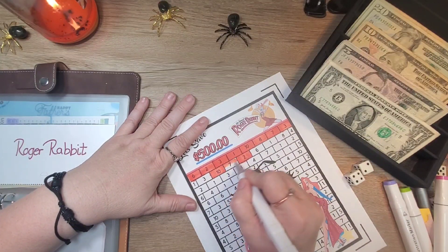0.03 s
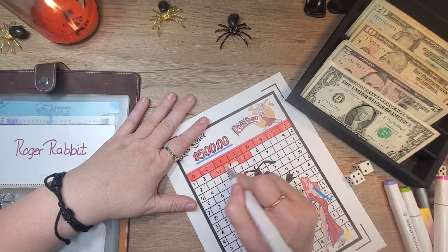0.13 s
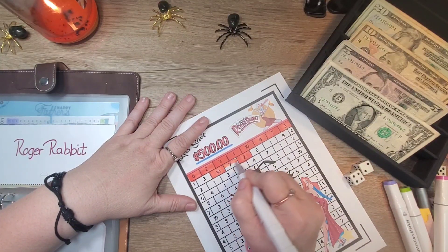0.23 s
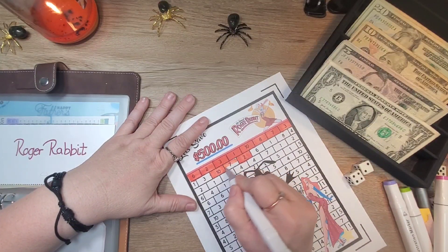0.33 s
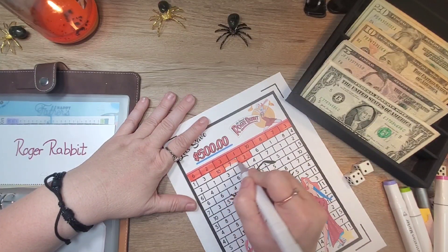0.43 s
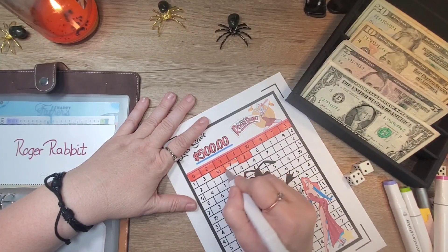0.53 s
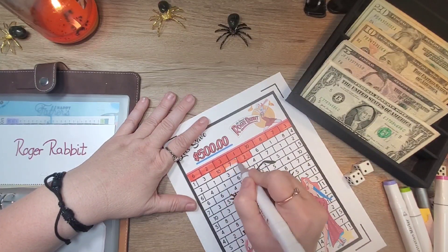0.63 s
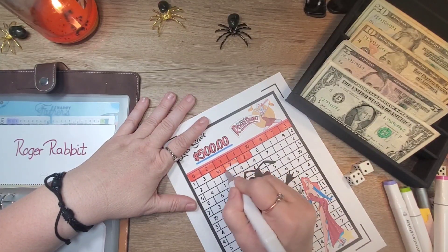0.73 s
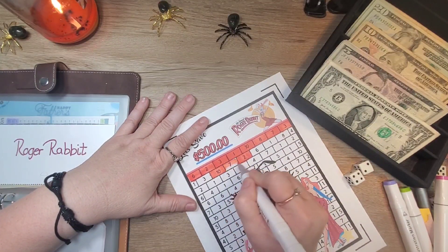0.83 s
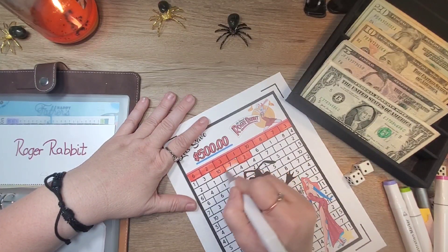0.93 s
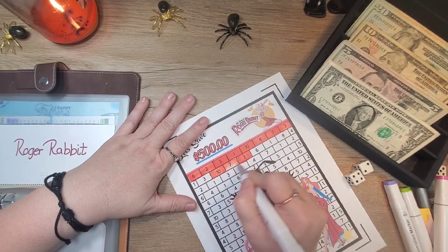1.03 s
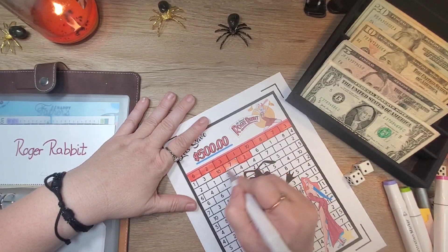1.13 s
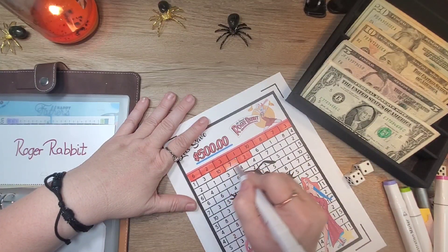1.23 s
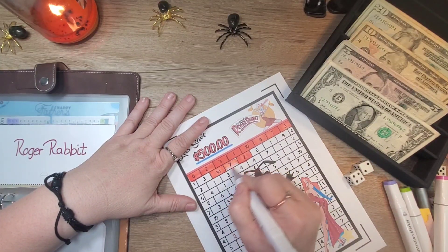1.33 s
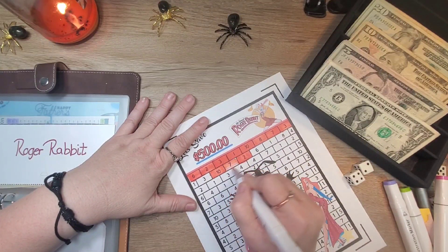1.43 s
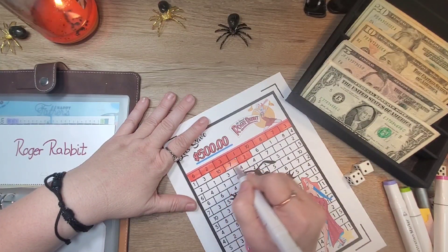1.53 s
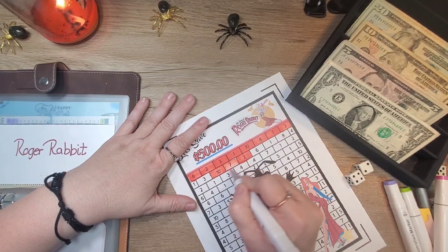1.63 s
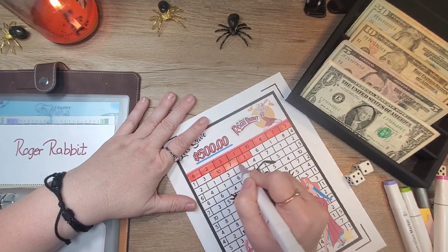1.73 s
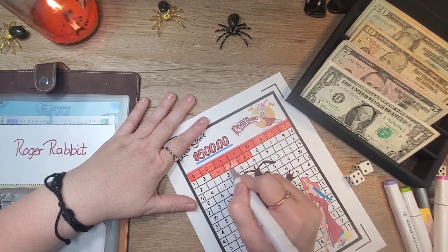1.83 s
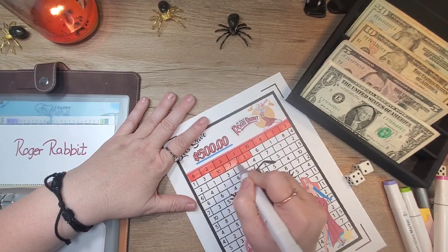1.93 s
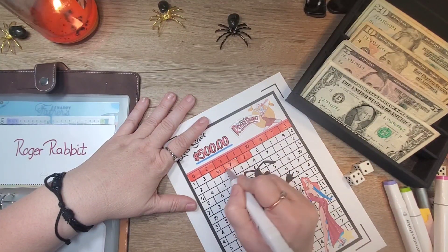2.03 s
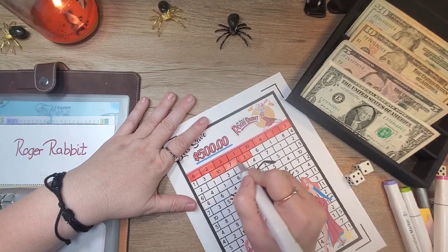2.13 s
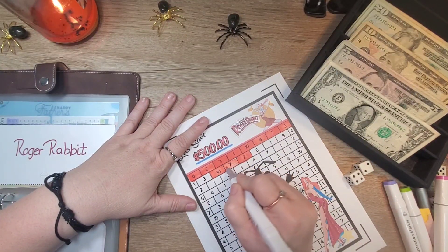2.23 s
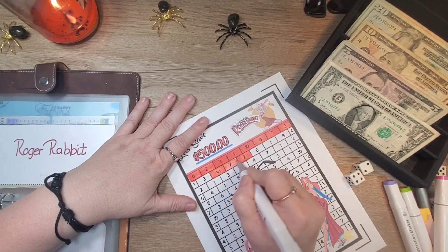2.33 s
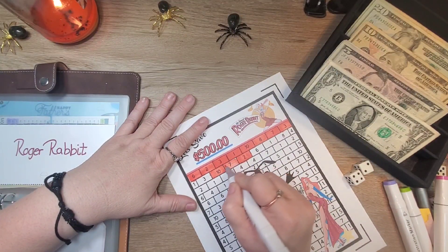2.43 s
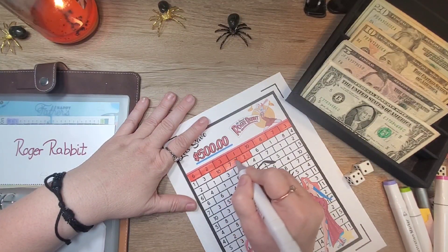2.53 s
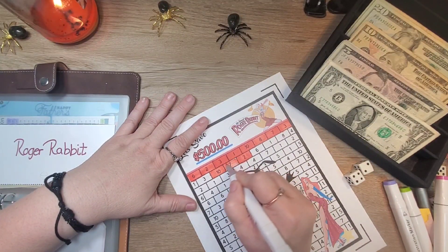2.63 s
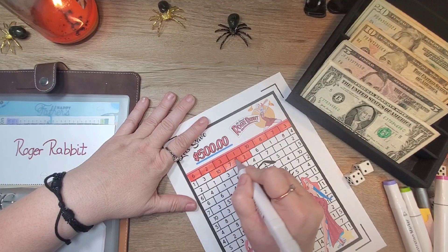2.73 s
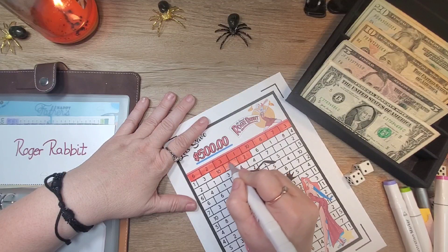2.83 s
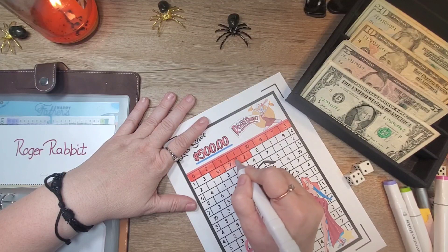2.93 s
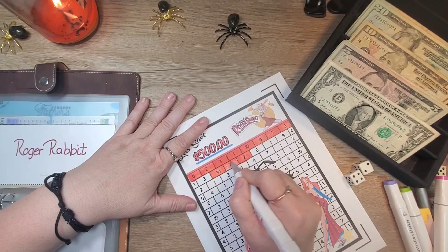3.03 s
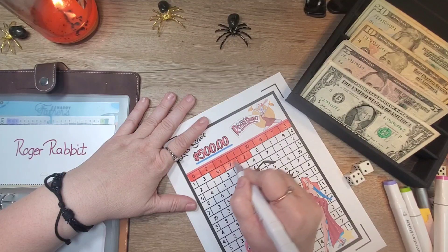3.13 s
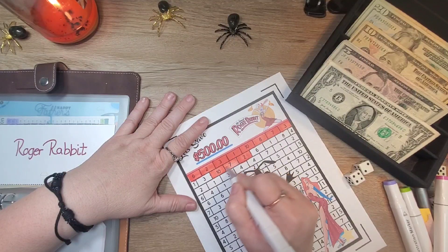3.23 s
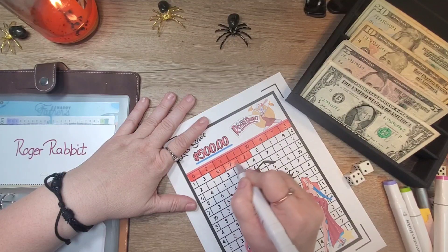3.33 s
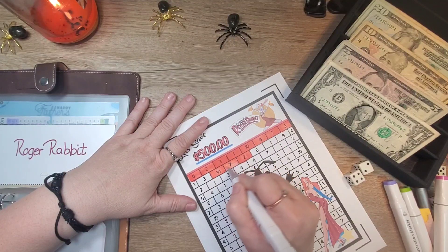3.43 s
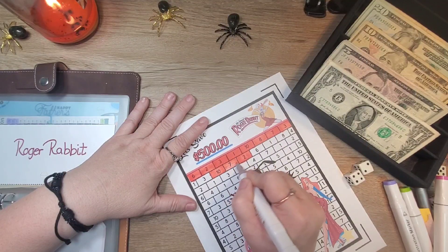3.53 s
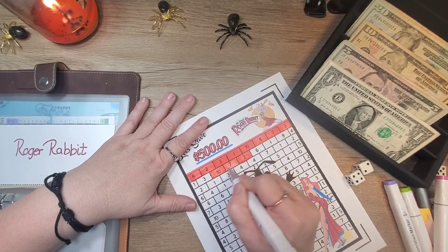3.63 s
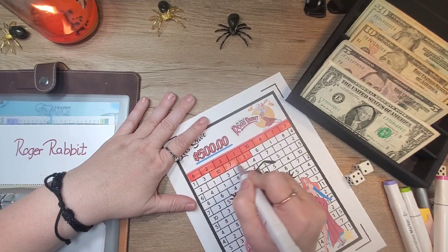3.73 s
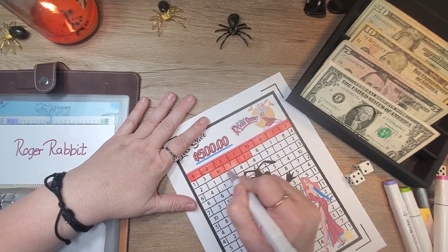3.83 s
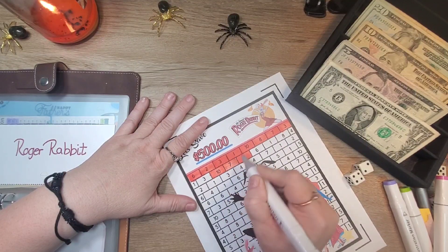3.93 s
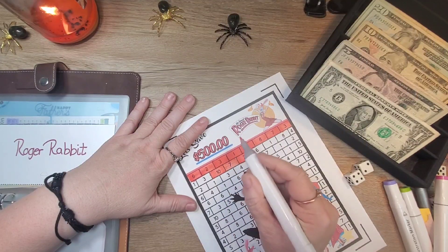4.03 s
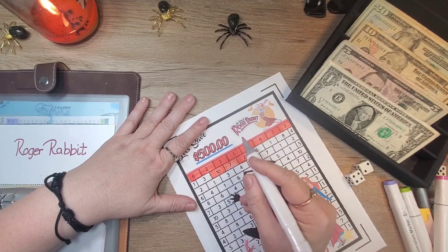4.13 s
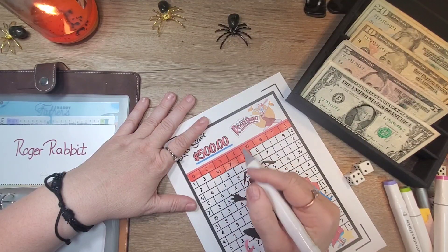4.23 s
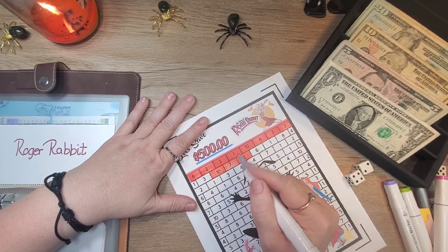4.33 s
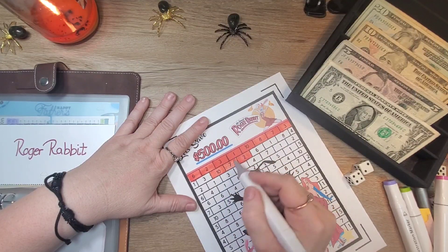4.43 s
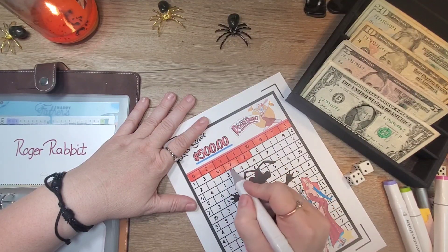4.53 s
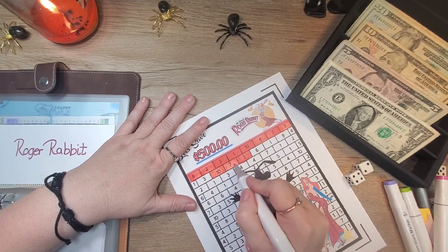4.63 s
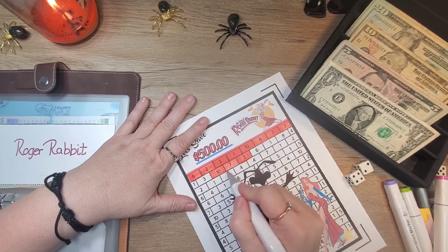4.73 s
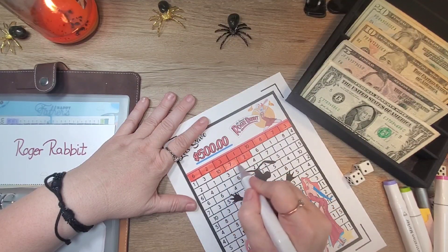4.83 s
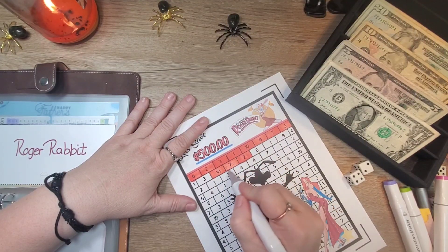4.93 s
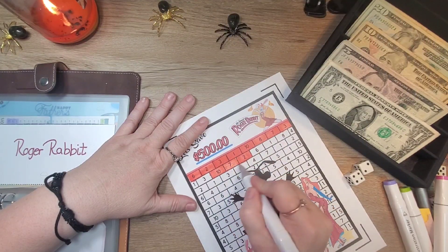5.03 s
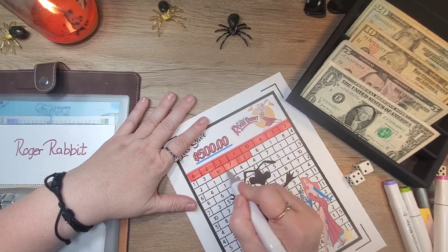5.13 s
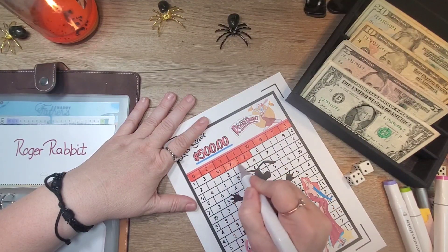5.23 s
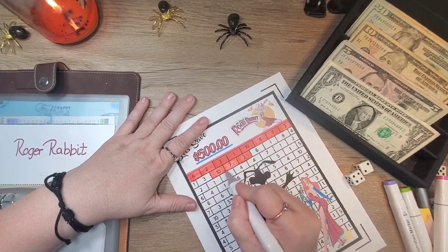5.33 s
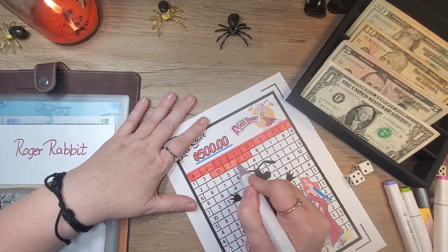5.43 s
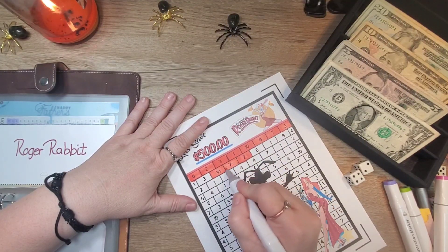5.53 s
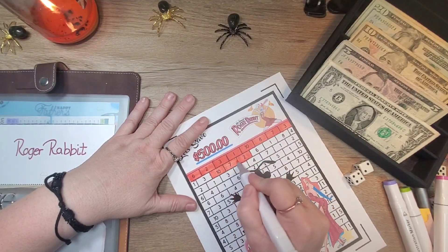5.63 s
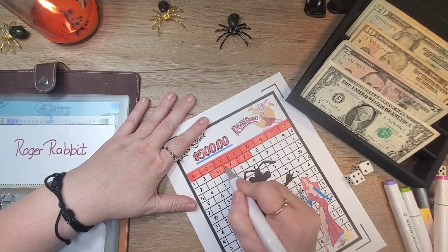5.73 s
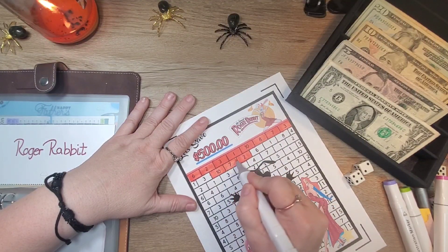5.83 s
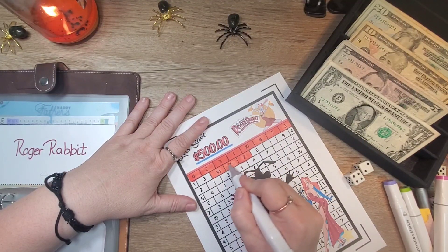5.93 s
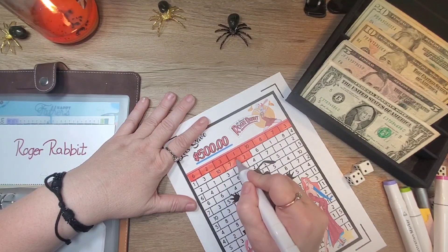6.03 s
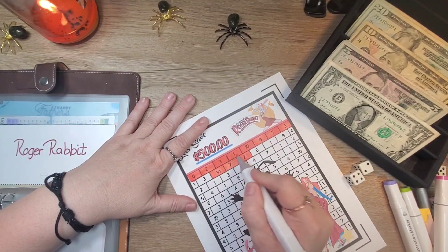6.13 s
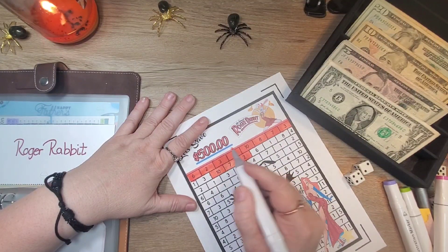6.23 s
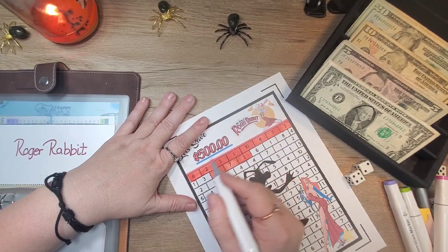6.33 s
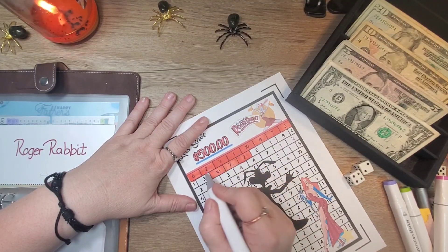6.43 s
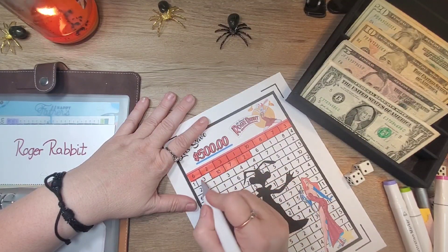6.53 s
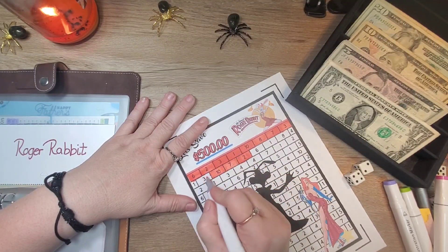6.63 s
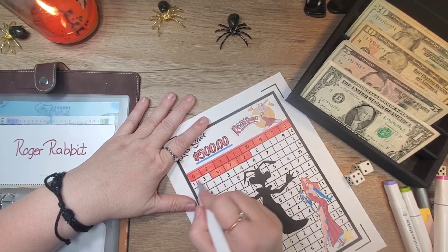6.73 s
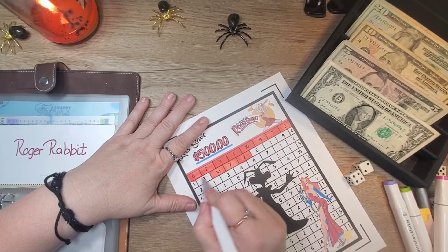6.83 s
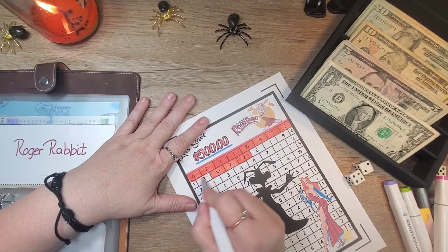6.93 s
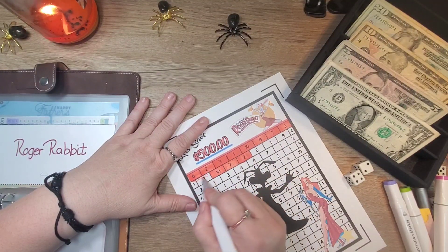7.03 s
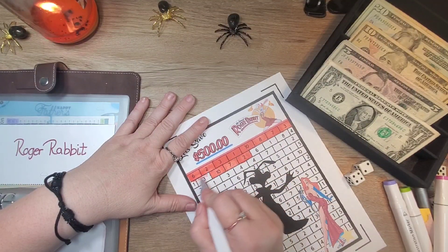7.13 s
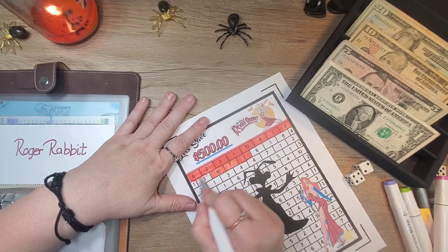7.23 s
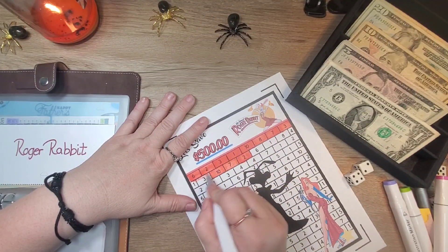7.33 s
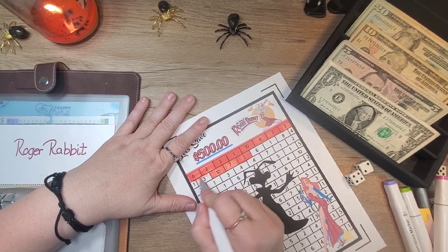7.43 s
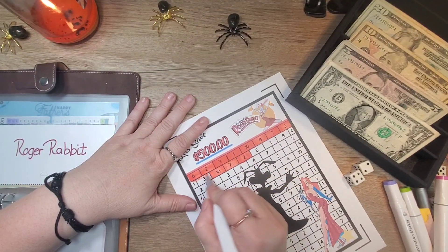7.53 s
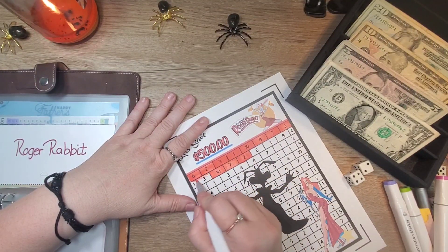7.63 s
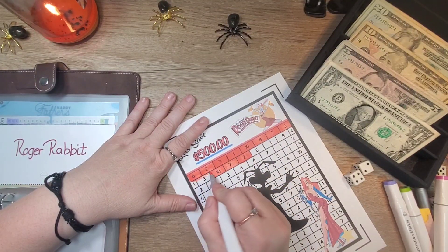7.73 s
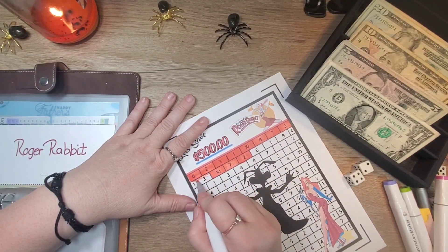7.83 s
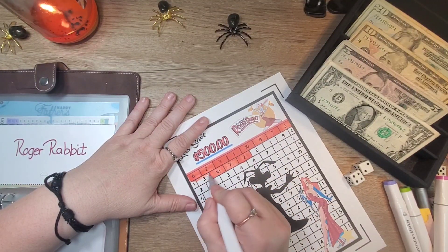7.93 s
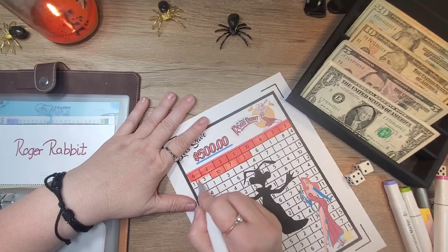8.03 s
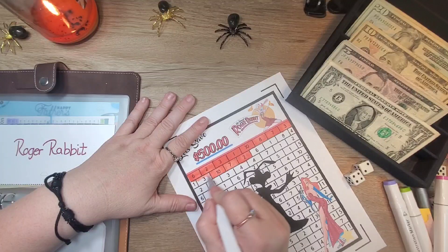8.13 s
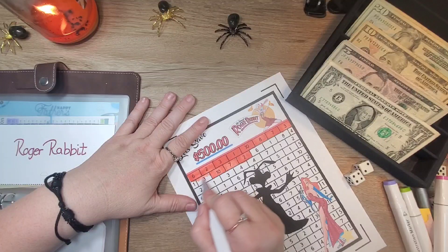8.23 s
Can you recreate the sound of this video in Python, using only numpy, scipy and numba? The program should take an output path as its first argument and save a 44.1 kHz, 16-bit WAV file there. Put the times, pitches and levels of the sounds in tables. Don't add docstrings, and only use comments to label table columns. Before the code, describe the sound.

A close stereo sound of a felt marker rubbing quickly to and fro on paper on a wooden desk, with faint low hum in a small quiet room. From 0 to about 4.0 seconds the strokes run steadily, nearly five round trips a second, each a dry high scratch swelling and fading, with thin squeaks around five kilohertz and little clicks at the turns. From 2.7 they hurry slightly and become louder and squeakier. At 4.2 and 4.5 the pen ticks lightly amid soft skin brushing and a barely audible steady chair whine. Scribbling resumes gently near 4.75, soon firm, rougher and less tonal, until 6.1. A sharp tick at 6.18, faint brushing and near silence follow, then a dry crack at 6.77. From 6.8 to 8.3 the flatter pen gives broader, hissier strokes, building from light to firm.

```python
import sys
import numpy as np
from scipy import signal
from scipy.fft import rfft, irfft, next_fast_len
from scipy.io import wavfile
from numba import njit

SR = 44100
rng = np.random.default_rng(int(sys.argv[2]) if len(sys.argv) > 2 else 0)


def ratio(d):
    e = np.asarray(d, float) / 20
    return 10 ** e


def dump_mix(stems):
    frames = np.atleast_2d(stems).T
    limited = np.clip(frames, -1, 1)
    pcm = np.round(limited * 32767).astype(np.int16)
    wavfile.write(sys.argv[1], SR, pcm)


N = 364707

# pitch_hz, density_db (per Hz)
HUM = [(20, -19), (35, 1.5), (45, -4), (58, 9), (72, -3), (100, -8.5), (121, 4), (150, -3.5), (190, -5),
       (250, -6), (620, -9), (800, -18), (2000, -18), (16000, -46)]
# pitch_hz, likeness (-1 to 1)
LIKENESS = [(60, 0.97), (180, 0.9), (550, -0.04), (1650, -0.48), (4970, -0.48), (15000, 0.048)]
HUM_DB = -56
ROOM_T60_S, ROOM_DB = 0.32, -16.5
# pitch_hz, left_louder_db, left_lead_rad (beyond the lag), other_spot_share (0-1)
PORTS = [(1000, 1, .8, .5), (2300, 5, 1.5, .6), (3000, 1, 1.3, .5), (3900, -6, .6, .5), (4600, -3, -.3, .3),
         (4950, 9, -2.4, .4), (5450, 8, -2, .5), (5900, 5, .3, .4), (6400, 5, -.7, .5), (6900, -5, 0, .7),
         (8300, 9, -2, .7), (8900, 0, -.5, .5), (9300, 5, -.8, .6), (15000, 0, -1, .8)]
PORT_LAG_S = 13 / 44100

# start_s, pitch_hz, level_db, overtones_db
WHINE = [
    (4.1, 978, -88, 0),
    (4.16, 985, -70, 0),
    (4.28, 978, -69, -2),
    (4.4, 972, -68, -14),
    (4.5, 978, -73, -16),
    (4.54, 978, -90, -16),
]
# multiple, level_db
WHINE_ORDERS = [(1, -1), (1.5, 0), (2, 0), (3, 2), (4, -5)]
# start_s, level_db
BRUSH = [
    [(4.0, -63), (4.2, -67.5), (4.26, -65), (4.3, -79), (4.48, -79), (4.52, -64), (4.62, -63), (4.68, -82),
     (4.74, -87)],
    [(6.13, -48), (6.2, -89), (6.25, -71), (6.33, -65.5), (6.42, -59.5), (6.48, -61.5), (6.53, -80),
     (6.79, -111)],
]
# pitch_hz, density_db (per Hz)
SKIN = [(600, -50.5), (1200, -26), (3000, -11), (6000, -8.5), (9000, -15.5), (13000, -13), (15500, -13.5)]
# start_s, crack_db, thump_db
TICKS = [
    (4.211, -53, -54),
    (4.2452, -71, -68.5),
    (4.5082, -53, -62),
    (6.1816, -43.5, -49.5),
    (6.774, -46.5, -69),
]

# pitch_hz, width_hz, level_db
SHEET = [(1143, 160, -23), (1622, 100, -32.5), (1872, 65, -22), (2335, 117, -17), (2893, 520, -20),
         (3063, 110, -14)]
NIB = [(4400, 240, -9.5), (4971, 82, 4), (5400, 570, -4)]
FELT = [(6730, 460, -12.5), (7880, 1850, -12.5), (8638, 660, -10.5), (6196, 625, -7.5)]
EDGE = [(10200, 360, -30.5), (11280, 700, -18.5), (12460, 1400, -12.5), (14640, 210, -21)]
# pitch_hz, width_hz, level_db
SHOULDER = [(3720, 530, -24.5)]
# start_s, tilt (0-1), pressure_db
GRIP = [
    (0, 0.12, 5),
    (1.8, 0.03, 0.5),
    (2.7, 0.23, 0.5),
    (3.5, 0.32, -1),
    (4, 0.33, 0.5),
    (4.8, 0.24, -4.5),
    (6.1, 0.1, -0.5),
    (6.8, 1, -8.5),
    (7.6, 0.95, -1.6),
    (8.27, .95, 3),
]
# upright_db, full_tilt_change_db, pressure_share
PARTS = [(-0.5, -3.5, .3), (0.3, -8, 0.13), (-1.26, 0.5, .1), (-6.5, 0.4, 1), (8, -17, .05)]

# start_s, level_db, swell_db (start to end), slip_rate_hz (full speed),
# squeak_db
OUTWARD = [(.042, -29.5, -4, 4914, -27), (.252, -30.5, -3.5, 5490, -20), (.46, -29, 1, 5726, -20),
           (.671, -30, -2.5, 5410, -20), (.887, -27.5, -3.5, 5210, -26), (1.097, -31.5, -6.5, 5420, -21),
           (1.309, -29, 1.5, 5500, -32.5), (1.524, -30.5, -3.5, 5500, -23), (1.741, -32.5, -5, 5360, -20),
           (1.956, -32, 3, 5210, -29.5), (2.157, -29.5, 5.5, 5440, -21), (2.364, -31.5, -2, 5400, -21),
           (2.571, -27.5, 3, 5185, -24), (2.767, -27, 9.5, 4950, -18.5), (2.965, -26.5, -1, 4582, -30),
           (3.152, -34.5, 2, 5340, -32.5), (3.348, -26.5, 10, 5570, -26.5), (3.55, -25, 0.5, 4900, -13.5),
           (3.749, -28.5, 2, 5390, -22.5), (3.953, -19, -11.5, 5640, -39),
           (4.745, -42, -19, 5400, -60), (4.894, -26.5, 5.5, 5177, -33), (5.095, -27, -2.5, 4750, -30),
             (5.293, -27, -1, 5500, -30), (5.488, -25.5, -0.5, 5770, -31), (5.684, -27, 1.5, 5690, -22.5),
             (5.877, -27, 2, 5690, -26), (6.064, -27, 0, 5100, -28.5), (6.918, -28.5, 1.5, 7020, -45),
             (7.129, -27, -1, 5940, -34), (7.336, -25, -1.5, 5755, -52), (7.552, -29.5, -2.5, 5650, -37),
             (7.765, -25, 6, 5657, -35), (7.989, -26, -1, 5730, -55), (8.2, -25, 1.5, 5400, -21)]
# start_s, level_db, swell_db, slip_rate_hz, snap_db
FIRST_BACK = [(-.052, -27.5, -7.5, 5450, -60), (0.1525, -30.5, -6, 5070, -20),
              (0.3548, -27.5, -2.5, 5800, -20.5), (0.5729, -27.5, 2.5, 6180, -13.5),
              (0.788, -31.5, 4.5, 5880, -17), (0.999, -29, -1, 5400, -19.5),
              (1.2075, -29.5, -2.5, 6080, -20), (1.423, -29, -1, 5880, -17), (1.6403, -29, -2, 5130, -16),
              (1.8631, -32.5, -8, 5670, -40), (2.0595, -30.5, -2.5, 5970, -24),
              (2.2672, -31, -0.5, 5660, -19.5), (2.4733, -30, -5.5, 5390, -41.5),
              (2.6758, -29, -2.5, 5550, -25), (2.8745, -23.5, -2.5, 4950, -14),
              (3.0659, -31, -9, 5500, -25), (3.243, -30, 4, 6460, -38.5),
              (3.4538, -26.5, -5.5, 5210, -13.5), (3.6575, -23, 0, 4930, -14),
              (3.8571, -22.5, 2, 4987, -16)]
# start_s, level_db, swell_db, slip_rate_hz, snap_db
LATER_BACK = [(4.796, -35, 5.5, 5200, -45), (5.0029, -27.5, 4.5, 5577, -31.5),
              (5.1995, -25, 0, 6160, -26.5), (5.395, -24, -3.5, 5193, -33),
              (5.591, -25.5, -3.5, 5780, -32.5), (5.7866, -23.5, -4.5, 5350, -27),
              (5.9722, -22.5, -0.5, 5190, -20), (6.794, -35.5, 7, 6410, -64),
              (7.0259, -30, -4.5, 6410, -42), (7.223, -31, 0, 7540, -39), (7.45, -29.5, -13, 6490, -24),
              (7.652, -30.5, -3.5, 6350, -31.5), (7.874, -31, -6.5, 5950, -26.5),
              (8.0999, -31, -6, 6070, -21.5)]
LIFTS = [
    3.969,
    6.12,
    8.3,
]
CHANGES = [
    2.72,
    4.3,
    6.5,
]
# turn_pause_s, mid_sag_db, slowing_s
MANNER = [
    [(.026, -4.5, 0.022), (.026, -2.5, 0.026)],
    [(.033, -2.5, 0.021), (.034, -1, 0.024)],
    [(.031, 0.5, 0.021), (0.034, -2.5, 0.019)],
    [(.022, 0, .016), (.036, 1.5, 0.025)],
]
# outward_db, return_db
GRAB_DB = [(-1, -7), (-2, -5), (-12, -9), (-13, -11)]
RETURN_SQUEAK_DB = [4.5, 7, -3, -22]
THUMP_DB, THUMP_FOLLOWS = -32.5, 0.53

LOCK_HZ, LOCK_WIDTH_HZ = 4950, 340
LOCK_SHARE, LOCK_PULL = .92, .3
UNLOCKED_DB, LOCK_FADE_DB = -24, -12
WANDER = .025


def rms_one(x):
    return x / np.sqrt(np.mean(x ** 2) + 1e-20)


def in_time(rows, outside=None):
    s, *columns = np.transpose(rows)
    t = np.arange(N) / SR
    return [np.interp(t, s, column, outside, outside) for column in columns]


def at_hz(points, hz):
    f, value = np.transpose(points)
    return np.interp(np.log(hz + 1), np.log(f + 1), value)


def colour(x, gain):
    size = next_fast_len(N + 4096)
    hz = np.fft.rfftfreq(size, 1 / SR)
    return irfft(rfft(x, size) * gain(hz), size)[..., :N]


def drift(rate_hz):
    r = np.exp(-2 * np.pi * rate_hz / SR)
    noise = rng.standard_normal(N + SR)
    return rms_one(signal.lfilter([1], [1, -2 * r, r * r], noise)[SR:])


def grains(per_s, spread_db):
    sizes = ratio(spread_db * np.minimum(rng.exponential(1, N), 4.0))
    signed = sizes * rng.choice([-1, 1], N)
    return rms_one(signed * (rng.random(N) < per_s / SR))


def resonate(x, modes):
    out = 0
    for k, (hz, width_hz, level_db) in enumerate(modes):
        r = np.exp(-np.pi * width_hz / SR)
        top = (-1) ** k * ratio(level_db) * (1 - r * r) / 2
        poles = [1, -2 * r * np.cos(2 * np.pi * hz / SR), r * r]
        out = out + signal.lfilter([top, 0, -top], poles, x + 1e-18)
    return out


@njit
def sweep(x, turn, r):
    y = np.zeros(len(x))
    for i in range(2, len(x)):
        drive = (1 - r * r) / 2 * (x[i] - x[i - 2])
        y[i] = drive + 2 * r * np.cos(turn[i]) * y[i - 1] - r * r * y[i - 2]
    return y


def hum():
    def alike(hz):
        return np.clip(at_hz(LIKENESS, hz), -.98, .98)

    mid = colour(rng.standard_normal(N), lambda hz: ratio(at_hz(HUM, hz)) * np.sqrt(1 + alike(hz)))
    side = colour(rng.standard_normal(N), lambda hz: ratio(at_hz(HUM, hz)) * np.sqrt(1 - alike(hz)))
    return ratio(HUM_DB) * np.array([mid + side, mid - side]) / np.std(mid)


def room(x):
    t = np.arange(SR // 2) / SR
    decay = ratio(-60 * t / ROOM_T60_S) * np.clip(t / 0.036, 0, 1)
    tail = rng.standard_normal((2, len(t))) * decay
    tail = tail / np.sqrt(np.sum(tail ** 2) / 2)
    tail = signal.lfilter([.5], [1, -.45], tail)
    return ratio(ROOM_DB) * signal.fftconvolve(x[None], tail, axes=1)[:, :N]


def ports(near, other):
    louder, lead, own = (np.array(PORTS)[:, [0, k]] for k in (1, 2, 3))

    def shared(hz):
        late = np.exp(-1j * (at_hz(lead, hz) + 2 * np.pi * hz * PORT_LAG_S))
        return ratio(-at_hz(louder, hz)) * late * np.sqrt(1 - at_hz(own, hz) ** 2)

    elsewhere = colour(other, lambda hz: ratio(-at_hz(louder, hz)) * at_hz(own, hz))
    return np.array([near, colour(near, shared) + elsewhere])


def whine():
    hz, _, overtones_db = in_time(WHINE)
    phase = np.cumsum(hz * (1 + 0.00069 * drift(36.2))) * 2 * np.pi / SR
    stack = 0
    for multiple, level_db in WHINE_ORDERS:
        fades = multiple not in (1, 2)
        stack = stack + ratio(level_db + fades * overtones_db) * np.sin(multiple * phase)
    level_db = in_time(WHINE, outside=-200)[1]
    return ratio(level_db + 3.0 * drift(25)) * stack


def brush():
    level = sum(ratio(in_time(rows, outside=-200)[0]) for rows in BRUSH)
    rub = colour(grains(15000, spread_db=7.0), lambda hz: ratio(at_hz(SKIN, hz)))
    return level * rms_one(rub)


def knocks(rows, decay_s, crack_db, thump_db):
    s, *levels_db = np.transpose(rows)
    burst = np.zeros((2, N))
    burst[:, np.round(s * SR).astype(int)] = ratio(levels_db)
    dying = signal.lfilter([1], [1, -np.exp(-1 / (decay_s * SR))], burst)
    crack, thump = dying * grains(14000, spread_db=-1.5)
    bright = resonate(crack, FELT + EDGE) + ratio(-18.5) * resonate(crack, NIB)
    return ratio(thump_db) * resonate(thump, SHEET + SHOULDER) + ratio(crack_db) * bright


def snaps():
    return [(s, snap_db, THUMP_DB + THUMP_FOLLOWS * (snap_db + 21.5))
            for s, *_, snap_db in FIRST_BACK + LATER_BACK if s > 0]


def strokes():
    force, slip_hz = np.zeros(N), np.full(N, 3000.)
    grab, squeak = np.ones(N), np.zeros(N)
    outward = [(*row, False) for row in OUTWARD]
    back = [(*row, True) for row in FIRST_BACK + LATER_BACK]
    rows = sorted(outward + back)
    next_starts = [row[0] for row in rows[1:]] + [np.inf]
    for (s, mean_db, swell_db, top_hz, accent_db, snapped), next_s in zip(rows, next_starts):
        passage, manner = np.searchsorted(LIFTS, s), np.searchsorted(CHANGES, s)
        pause_s, sag_db, slowing_s = MANNER[manner][snapped]
        length = min(next_s - pause_s, LIFTS[passage]) - s
        if snapped:
            first, rise_s = s - .001, np.clip(0.0032 * ratio(-33.5 - accent_db), .001, .01)
            squeak_db = mean_db + RETURN_SQUEAK_DB[manner]
        else:
            first, rise_s = s - .004, .012
            squeak_db = accent_db
        i = np.arange(max(round(first * SR), 0), min(round((s + length + 0.0081) * SR), N))
        u = (i / SR - s) / length
        rise = np.clip((i / SR - first) / rise_s, 0, 1)
        fall = np.clip((s + length + 0.015 - i / SR) / slowing_s, 0, 1)
        level_db = mean_db + np.interp(u, [.2, .5, .82], [-swell_db / 2, sag_db, swell_db / 2])
        force[i] = ratio(level_db) * rise * fall ** 2.28
        slip_hz[i] = 1.08 * top_hz * np.sin(np.pi * np.clip(.12 + .86 * u, .03, .97)) ** 0.244
        grab[i] = ratio(GRAB_DB[manner][snapped]) * np.interp(u, [.75, 1], [1, .25])
        squeak[i] = ratio(squeak_db + LOCK_FADE_DB * u) * rise * fall
    return force, slip_hz, grab, squeak


def shares():
    tilt, pressure_db = in_time(GRIP)
    return [upright_db + tilted_db * tilt + follows * pressure_db
            for upright_db, tilted_db, follows in PARTS]


def wavering(drive, modes):
    return sum(ratio(4.26 * drift(17.2)) * (-1) ** k * resonate(drive, [mode])
               for k, mode in enumerate(modes))


def pen(drive):
    levels_db = shares()
    sheet, nib, felt, edge = (ratio(level_db) * wavering(drive, modes)
                              for level_db, modes in zip(levels_db, (SHEET, NIB, FELT, EDGE)))
    small = signal.butter(10, 4500, "high", fs=SR, output="sos")
    flat = signal.butter(8, 3250, fs=SR, output="sos")
    shoulder = ratio(levels_db[4]) * resonate(drive, SHOULDER)
    return signal.sosfilt(flat, sheet) + shoulder + signal.sosfilt(small, nib + felt + edge)


def friction(force, slip_hz, grab):
    catches = force * ratio(0.52 * drift(120)) * grains(12000, spread_db=1.5)
    turn = 2 * np.pi * slip_hz * (1 + .025 * drift(150)) / SR
    octave_turn = np.minimum(2 * turn, 3)
    r = np.exp(-np.pi * 350 / SR)
    band = sweep(sweep(catches, turn, r), turn, r)
    slip = resonate(band, [(5100, 3600, 0.94)])
    octave = sweep(sweep(catches, octave_turn, r * r), octave_turn, r * r)
    slip_level = grab * ratio(15.0 + shares()[4])
    return ratio(13.5) * pen(catches) + slip_level * (slip + ratio(-24.0) * octave)


def squeaks(slip_hz, squeak, wander):
    speed_wander, level_wander = wander
    waver = drift(215)
    flutter = ratio(2 * drift(210) + 0.84 * level_wander)
    free_hz = LOCK_SHARE * slip_hz * (1 + WANDER * speed_wander)
    lock = np.exp(-((free_hz - LOCK_HZ) / LOCK_WIDTH_HZ) ** 2)
    hz = free_hz + LOCK_PULL * np.sqrt(lock) * (LOCK_HZ - free_hz)
    phase = np.cumsum(hz * (1 + 0.018 * waver)) * 2 * np.pi / SR
    level = ratio(4.5) * squeak * (lock + ratio(UNLOCKED_DB)) * flutter
    tone = level * np.sin(phase)
    octave = level * np.sin(2 * phase + 2 * np.roll(waver, 900)) * np.roll(flutter, 400)
    return tone + resonate(octave, [(9100, 180, -2.5), (11350, 520, -23.5)])


def contact(force, slip_hz, grab):
    flips = knocks(snaps(), decay_s=0.0042, crack_db=16, thump_db=36.0)
    return friction(force, slip_hz, grab) + flips + brush()


def scene():
    force, slip_hz, grab, squeak = strokes()
    wander = drift(24.86), drift(26.7)
    ticks = knocks(TICKS, decay_s=0.005, crack_db=15.5, thump_db=34.0)
    near = contact(force, slip_hz, grab) + squeaks(slip_hz, squeak, wander) + ticks
    other = contact(force, slip_hz, grab) + squeaks(slip_hz, squeak, wander)
    far = whine()
    return ports(near, other) + room(near) + [far, np.roll(far, 6)] + hum()


def roll_off(x):
    return signal.sosfilt(signal.butter(12, 16520, fs=SR, output="sos"), x)


def record(dry):
    rounded = .7 * np.tanh(dry / .7)
    low_pass = signal.cheby2(10, 30, 15950, fs=SR, output="sos")
    return roll_off(signal.sosfilt(low_pass, rounded))


dry = scene()
out = record(dry)
dump_mix(out)
```